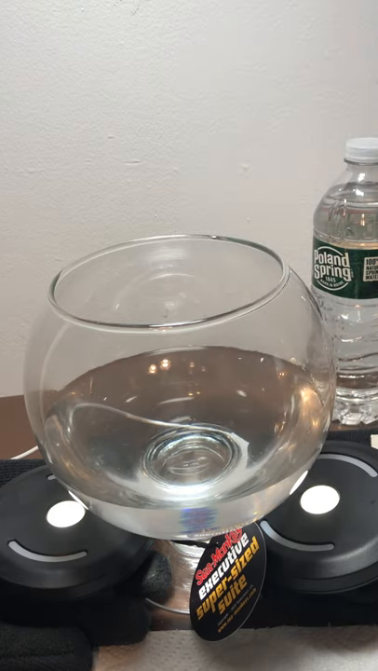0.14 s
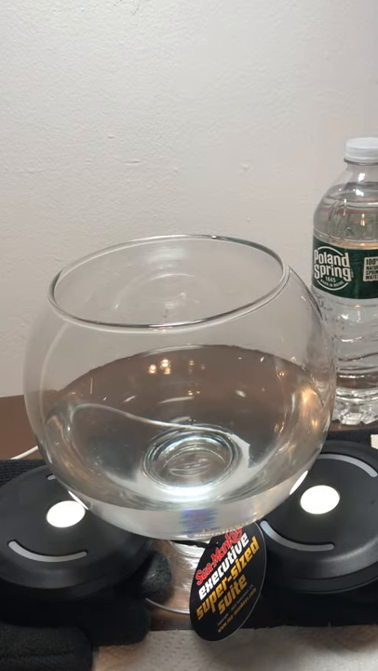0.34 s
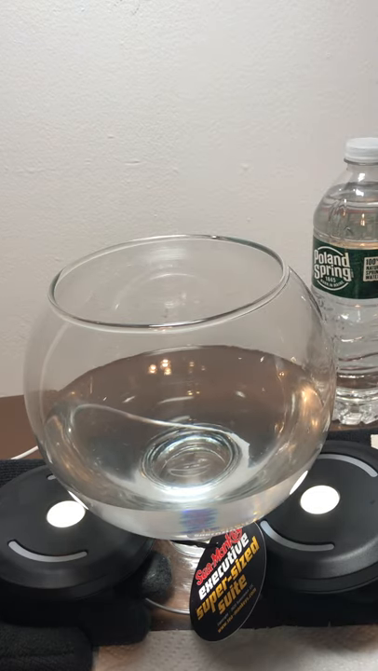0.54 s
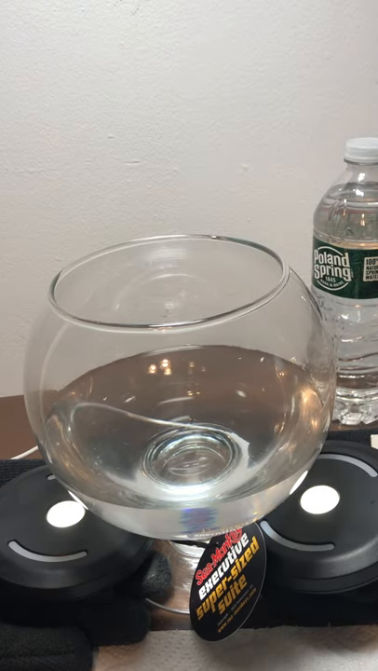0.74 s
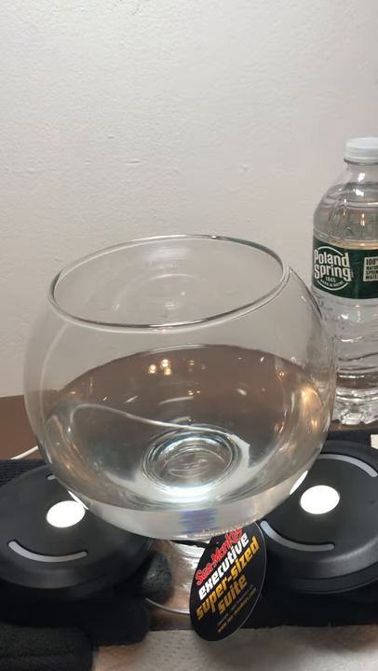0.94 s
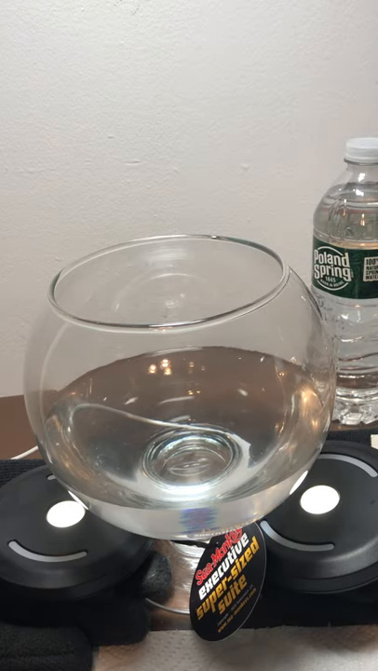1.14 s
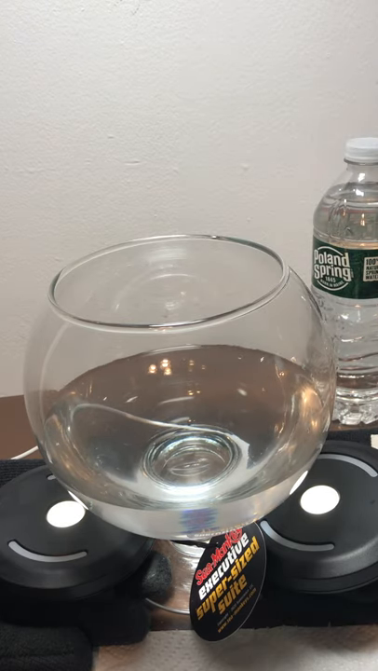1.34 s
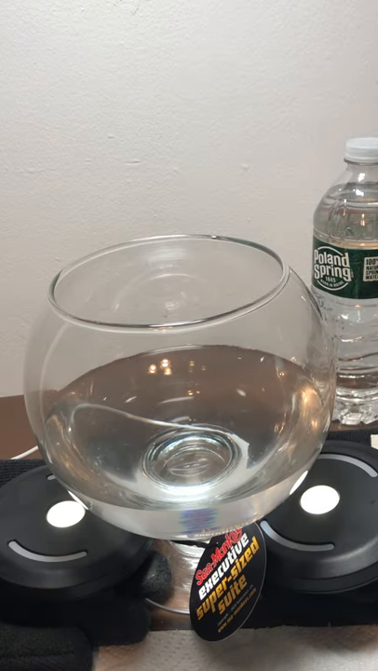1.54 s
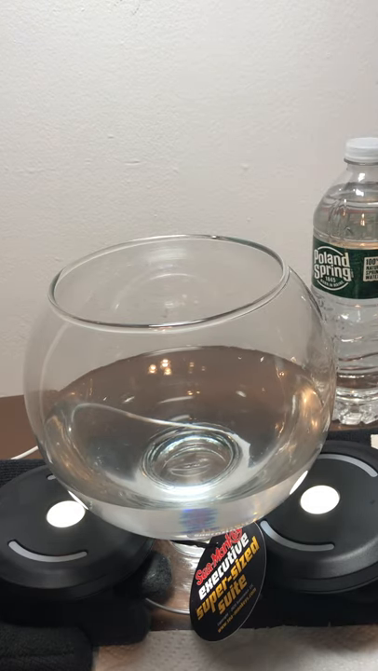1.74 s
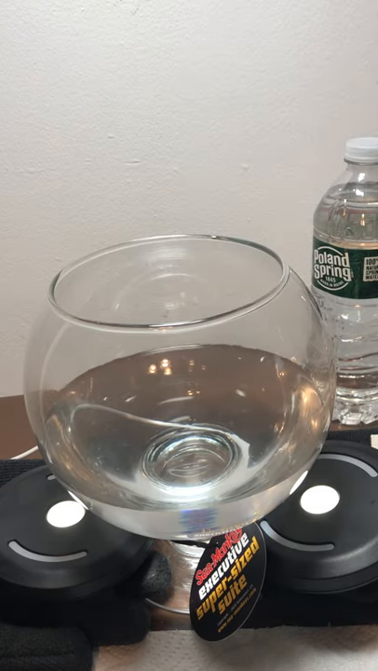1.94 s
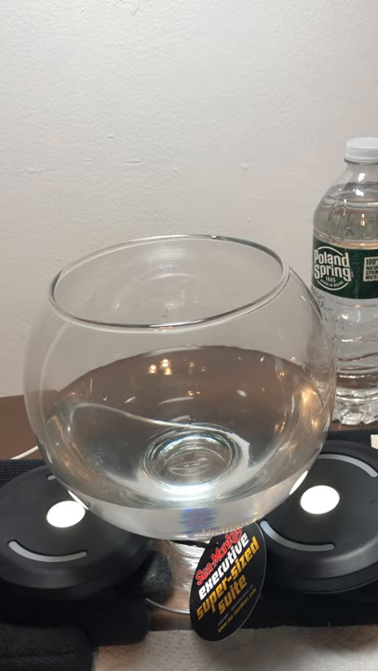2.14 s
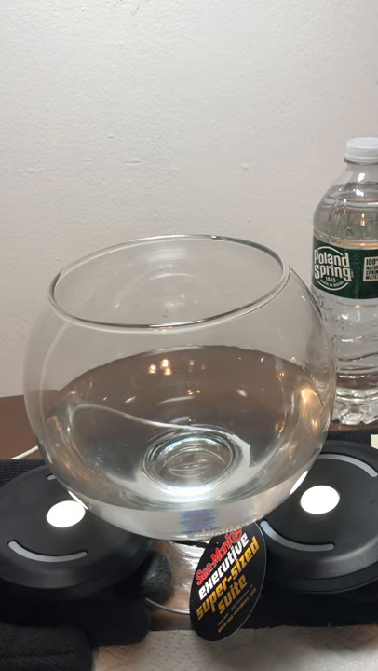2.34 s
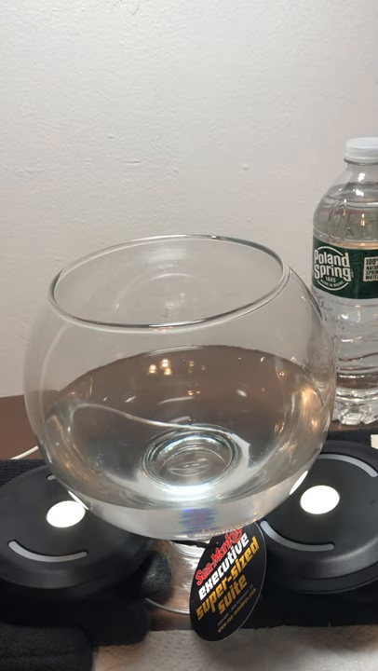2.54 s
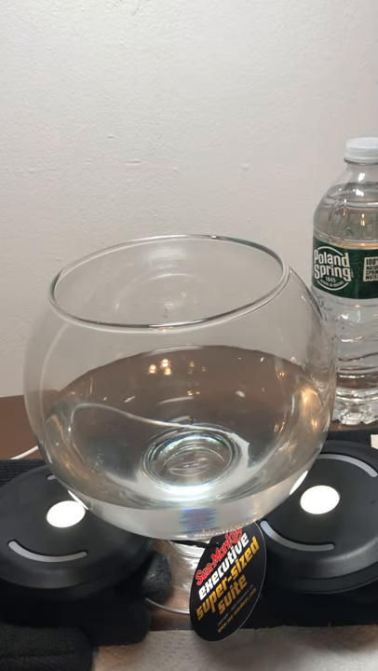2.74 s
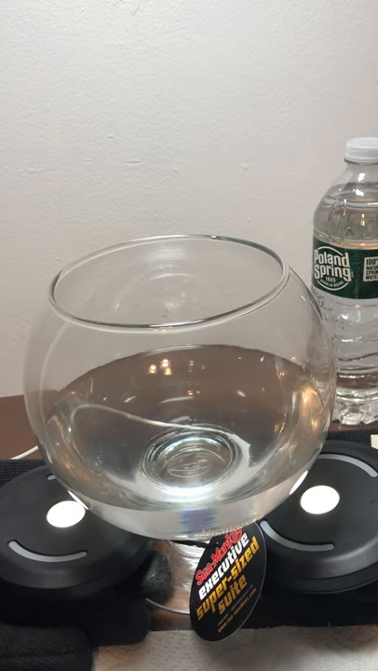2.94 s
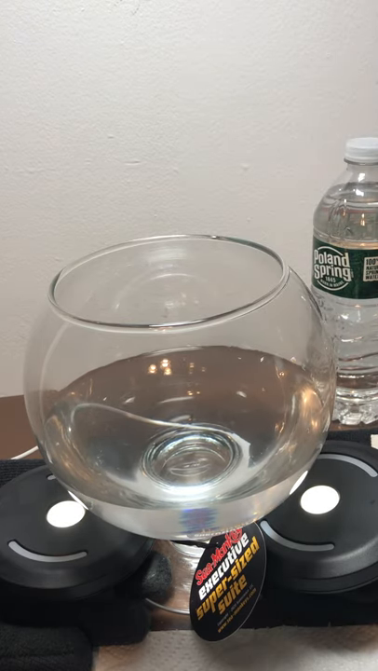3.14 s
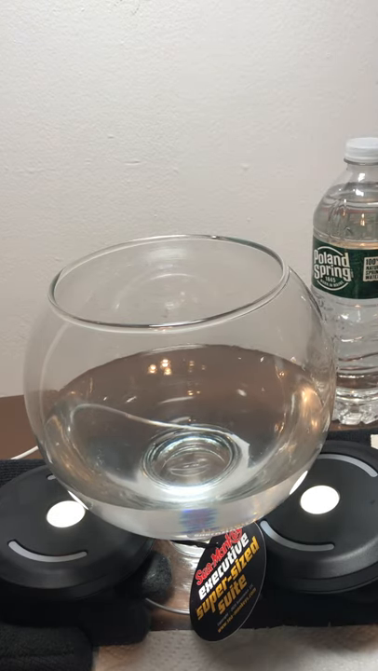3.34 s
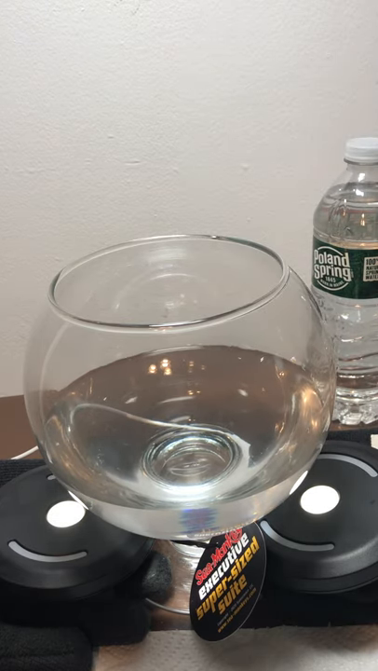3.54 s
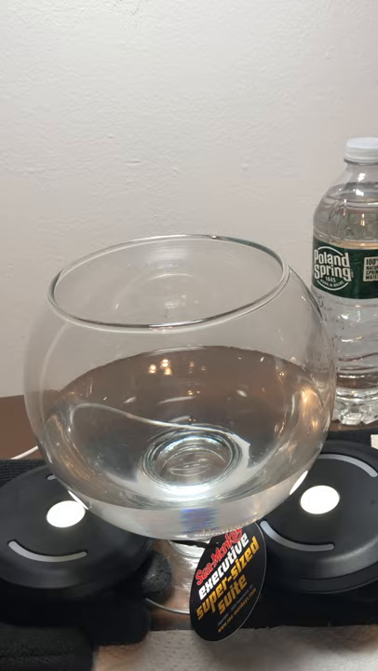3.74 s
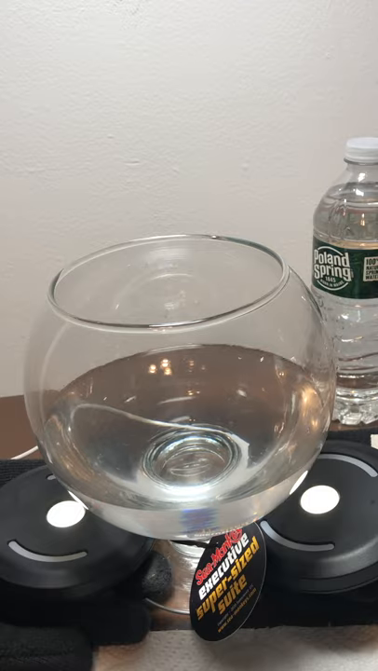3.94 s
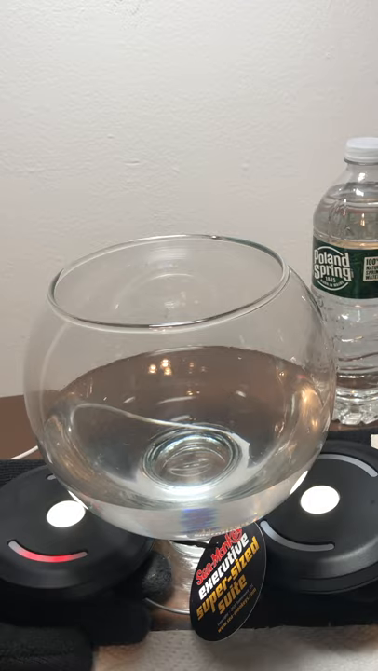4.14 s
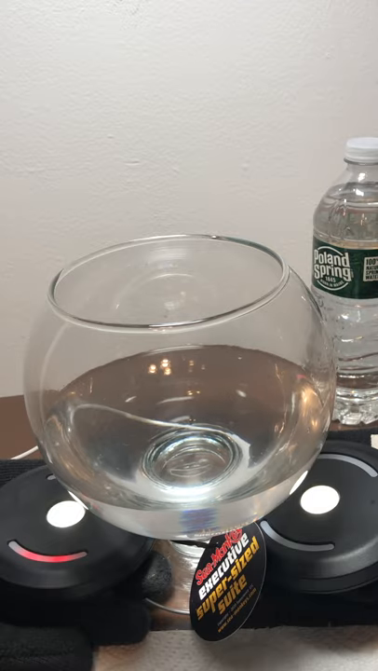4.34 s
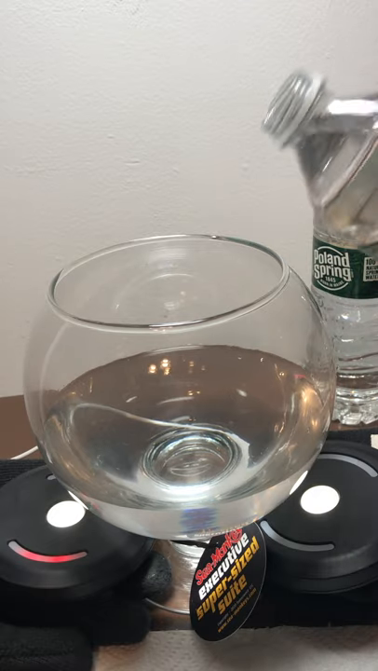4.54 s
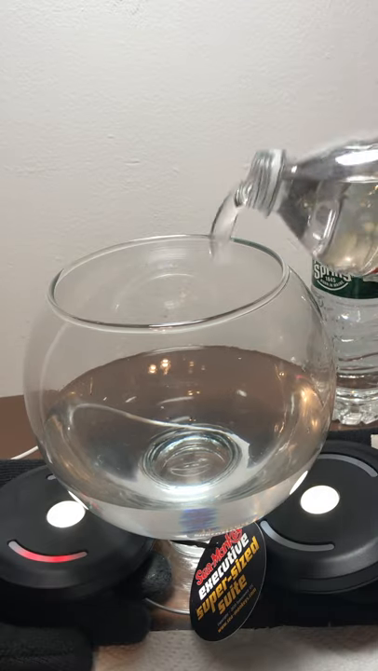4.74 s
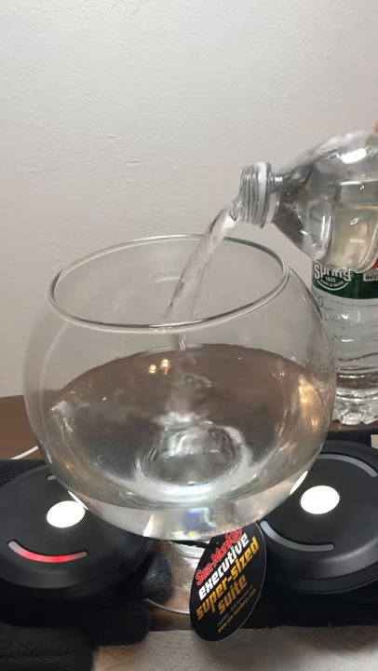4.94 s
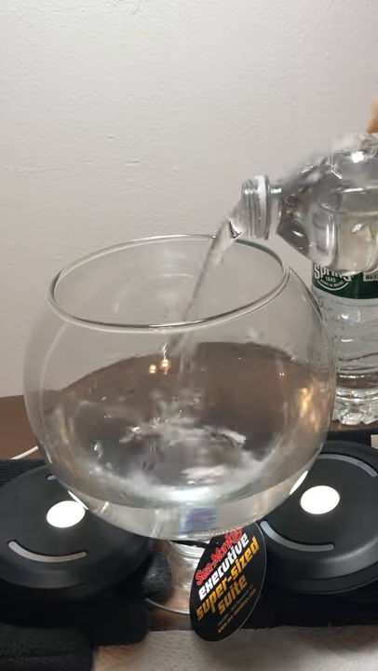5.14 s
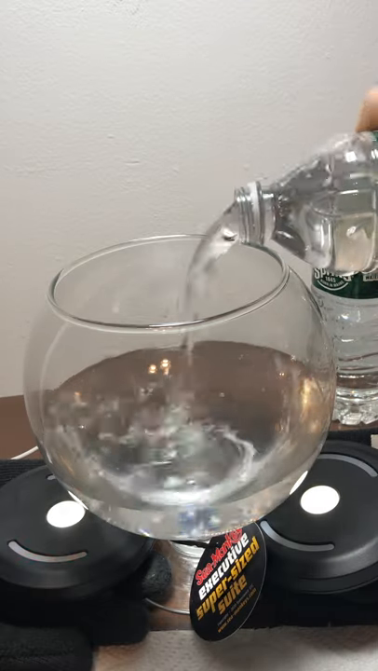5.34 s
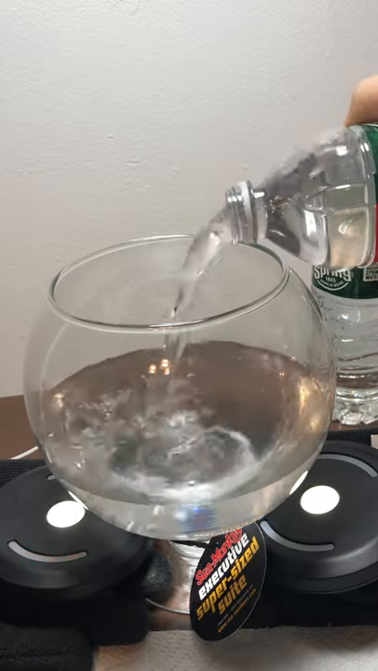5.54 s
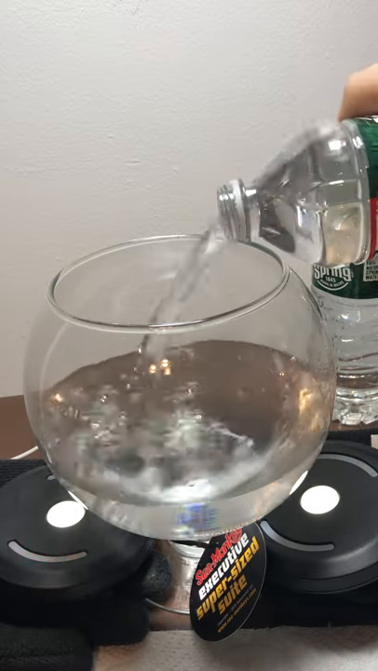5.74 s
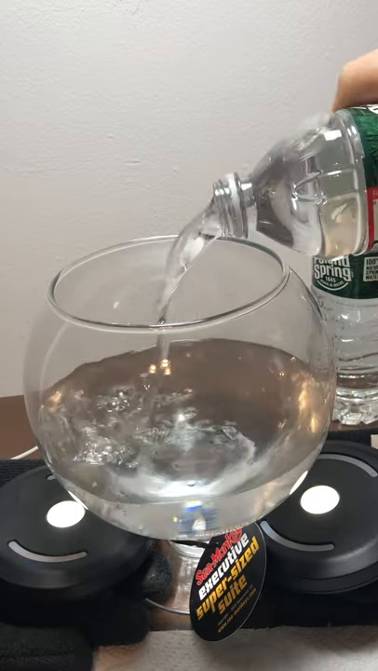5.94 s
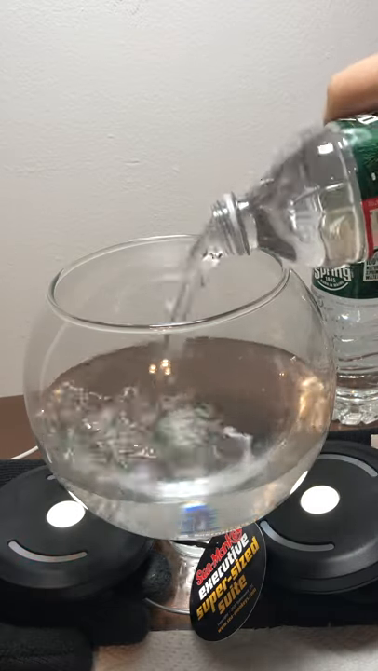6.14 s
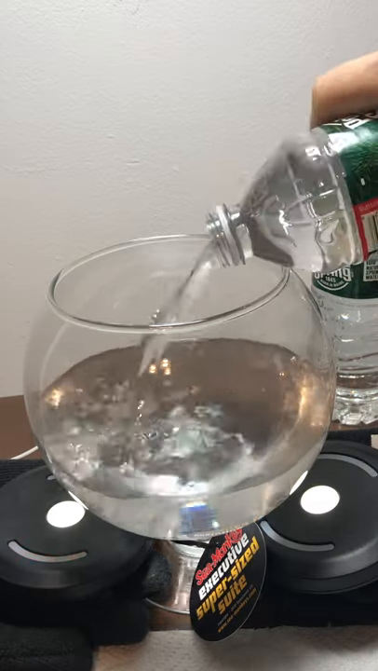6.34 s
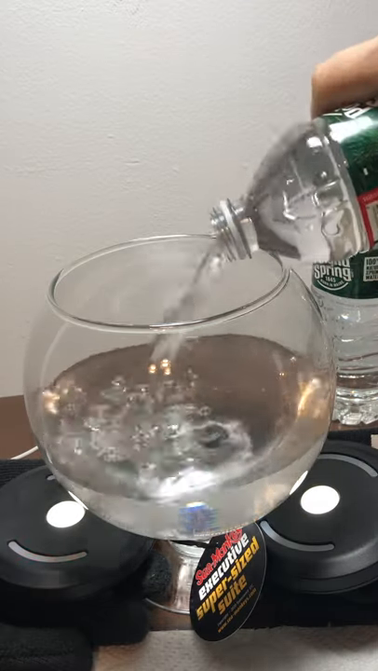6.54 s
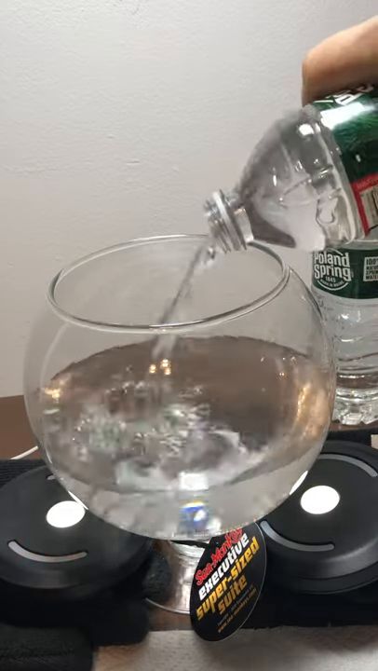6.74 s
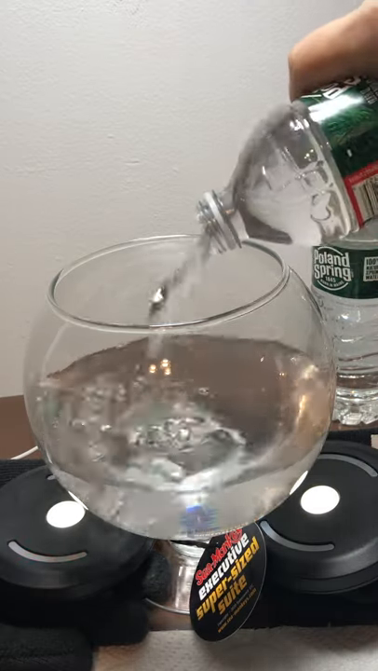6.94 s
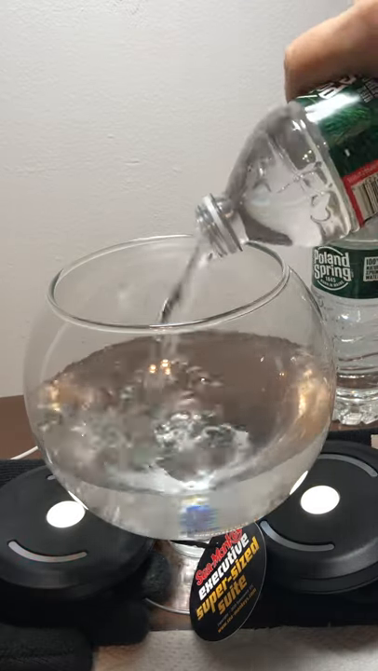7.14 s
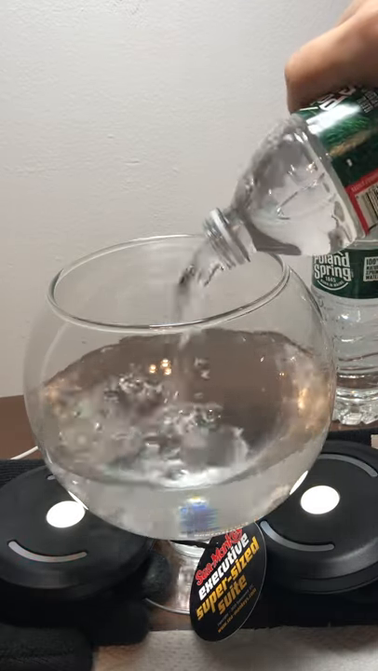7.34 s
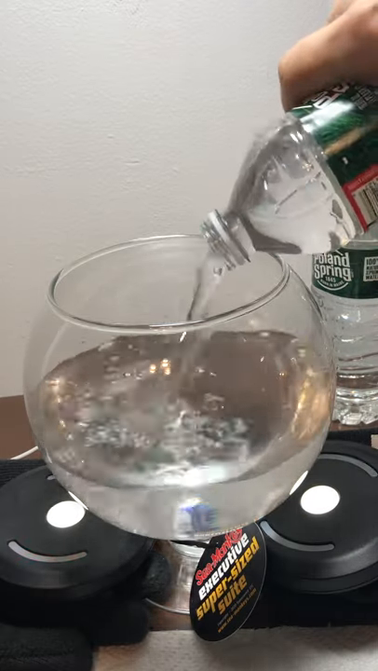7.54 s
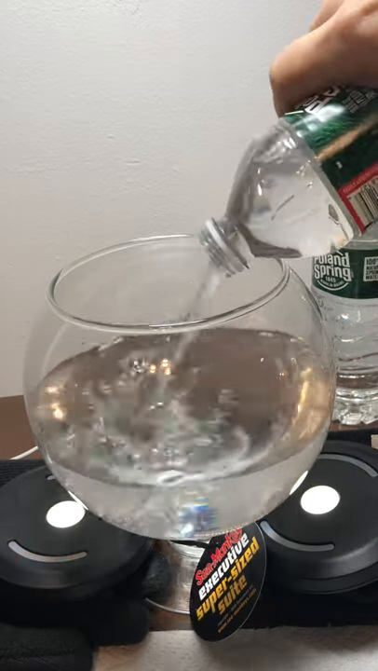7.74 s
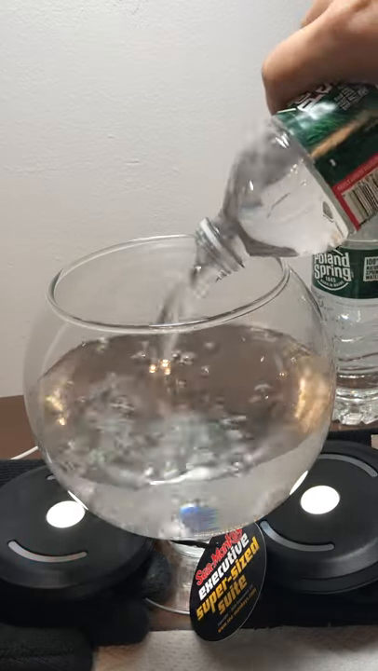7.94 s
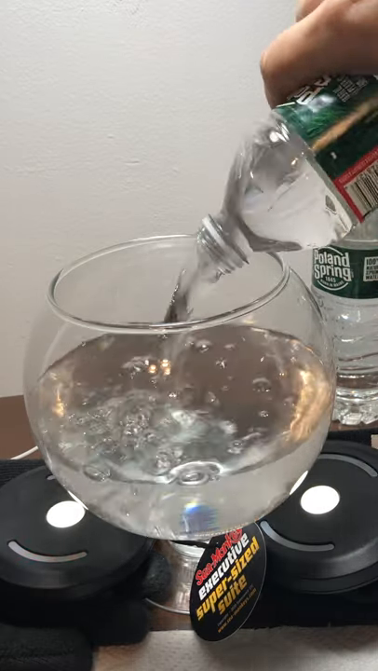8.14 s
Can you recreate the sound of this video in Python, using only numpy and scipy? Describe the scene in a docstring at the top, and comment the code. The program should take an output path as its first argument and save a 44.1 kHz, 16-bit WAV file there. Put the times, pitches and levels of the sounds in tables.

```python
"""A thin plastic bottle ticks and snaps in the hand, in a quiet room, until the seal of its cap cracks open.
Then water pours into a half-full glass bowl. The stream arrives in slugs: each splashes and traps
a pocket of air that glugs and sets the bowl ringing, while small bubbles plink and fizz around it
and droplets patter back. A faint mains hum lies under everything."""
import sys
import numpy as np
from scipy import signal
from scipy.fft import rfft, irfft
from scipy.io import wavfile
from scipy.ndimage import uniform_filter1d

SR = 44100
rng = np.random.default_rng(int(sys.argv[2]) if len(sys.argv) > 2 else 0)


def store_wav(level_fs):
    """Save 16-bit WAV to argv[1]."""
    pcm = np.round(np.clip(np.atleast_2d(level_fs), -1, 1) * 32767)
    wavfile.write(sys.argv[1], SR, pcm.T.astype(np.int16))


N = 361619
TIME = np.arange(N) / SR

# air pockets trapped by the slugs of water: start_s, level_db, pitch_hz, t60_s, bowl_ring_db
GLUGS = [(4.980, -29.5, 558.5, 0.18, -49.5), (5.183, -45.5, 711, 0.13, -63), (5.257, -44, 682, 0.088, -59),
         (5.300, -43, 597, 0.39, -55), (5.4324, -29.5, 550, 0.13, -44), (5.585, -37, 507, 0.038, -49.5),
         (5.623, -38.5, 413, 0.01, -75), (5.680, -35.5, 715, 0.047, -50.5), (5.753, -45.5, 700, .1, -56),
         (5.918, -40, 640, 0.044, -55), (5.931, -41, 594, 0.24, -53), (6.015, -42.5, 624, 0.081, -55),
         (6.059, -40, 469, 0.32, -44), (6.425, -37, 721.5, 0.12, -42), (6.541, -34.5, 752, 0.058, -49),
         (6.619, -34, 632, 0.06, -69), (6.633, -38, 666, 0.22, -40.5), (6.7364, -27, 617, 0.095, -57),
         (6.757, -36, 616, 0.2, -59), (6.8435, -28, 626, 0.06, -32), (7.048, -24.5, 535, 0.022, -31),
         (7.056, -35.5, 522, .11, -27), (7.143, -27.5, 500, .055, -38.5), (7.179, -35.5, 970, 0.01, -48),
         (7.260, -30, 633, .11, -46), (7.283, -31, 615.6, 0.36, -38), (7.4452, -16.5, 460, 0.015, -47),
         (7.4557, -23.5, 642, 0.066, -32), (7.575, -24, 631, 0.068, -30.5), (7.5935, -31.5, 589, 0.13, -44),
         (7.6826, -28.5, 602, .1, -42), (7.8, -31, 570, 0.028, -40), (7.8117, -22, 468, 0.062, -45),
         (7.8239, -26, 468, 0.099, -32.5), (7.932, -28, 657, 0.016, -37.5),
         (8.0216, -30.5, 474.6, 0.14, -37), (8.109, -29, 454, 0.035, -51), (8.1385, -27, 650, 0.034, -44)]
# modes of the air in the bowl: pitch_hz, level_db, t60_s
BOWL_AIR_MODES = [(506.7, 2.5, 0.12), (648.4, -3, 0.49)]
# modes of the glass wall: pitch_hz, level_db, t60_s
GLASS_MODES = [(1525, 15.5, 0.07), (1746, 17.5, 0.78), (2370, 10, 0.11), (2963, 14.5, 0.07),
               (4130, 3, 0.14), (4906, -1, 0.039)]
# slugs and drops hitting the surface: start_s, level_db, resonance_hz
SPLASHES = [(4.982, -35, 4900), (5.039, -44.5, 4700), (5.148, -40, 3800), (5.286, -37.5, 8200),
            (5.428, -48, 6120), (5.469, -40.5, 6270), (5.595, -41, 4270), (5.637, -43.5, 5800),
            (5.68, -36, 8700), (5.793, -41, 10600), (5.809, -35.5, 6350), (5.928, -38.5, 7160),
            (5.998, -39.5, 5800), (6.079, -37.5, 5300), (6.186, -43, 5200), (6.269, -44.5, 4930),
            (6.4132, -34, 4750), (6.424, -31.5, 8700), (6.515, -38.5, 5000), (6.540, -33.5, 7800),
            (6.624, -35, 9200), (6.726, -30.5, 8060), (6.844, -25, 5070), (7.04, -38, 5000),
            (7.056, -27, 5240), (7.140, -29, 5730), (7.162, -31, 7740), (7.258, -33, 8100),
            (7.443, -33.5, 6050), (7.491, -45, 11900), (7.582, -30, 9000), (7.687, -27, 7000),
            (7.810, -25.5, 6850), (7.907, -31.5, 12000), (7.932, -25, 8400), (8.023, -29.5, 3770),
            (8.034, -32, 10900), (8.155, -29.5, 4470)]
# small bubbles that stand out of the fizz: start_s, level_db, pitch_hz
PLINKS = [(3.336, -48, 1370), (4.9751, -44, 1300), (5.149, -38, 3480), (5.258, -44, 1640),
          (5.656, -50, 1730), (5.602, -42.5, 4200), (6.518, -39.5, 3130), (6.537, -41.5, 2883),
          (6.836, -40.5, 2386), (7.044, -41.5, 3090), (7.256, -41, 1610), (7.291, -46, 1580),
          (7.442, -32.5, 2398), (7.492, -47, 1525), (7.575, -22.5, 3357), (7.798, -38, 2580),
          (7.811, -39, 3070), (7.907, -37, 3420), (8.021, -36, 3046)]
# pockets that float up to the surface: start_s, peak_db, start_pitch_hz
BLOOPS = [(5.200, -56, 884), (5.238, -52.5, 817), (5.700, -51, 641), (5.88, -64, 1034), (6.955, -52, 673),
          (7.012, -46, 725), (7.232, -47.5, 790), (7.474, -43.5, 884), (7.625, -47, 715),
          (8.035, -50.5, 1040), (8.146, -55, 770)]
# fader moves of the running stream: time_s, fizz_db, slosh_db, hollow_tone_db
STREAM_FADERS = [(4.96, -56, -93, -73), (5.14, -73, -58, -61.5), (6.42, -64.5, -48.5, -51.5),
                 (6.69, -63.5, -48.5, -58.5), (8.2, -63, -46, -49.5)]
# loudness of a tiny bubble by its pitch: pitch_hz, level_db
FIZZ_LEVELS = [(900, 12), (1600, -16.5), (2100, -12), (3200, -11), (5000, -7.5), (8000, -5), (12000, -8),
               (15000, 1.5)]
# tone colour of spray: frequency_hz, level_db
SPRAY_EQ = [(300, 7), (1500, -40.5), (3000, -3.5), (6000, 1), (10000, -2), (16000, -9.5)]
# tone colour of sloshing water: frequency_hz, level_db
SLOSH_EQ = [(30, -15), (75, 2.5), (160, 7.5), (400, -2), (750, 5), (1100, -9.5), (1600, -10), (3000, -13.5),
            (16000, -31.5)]
# sharp snaps of the bottle and its seal: start_s, level_db, resonance_hz
SNAPS = [(0.615, -44, 9420), (0.939, -37.5, 3120), (1.081, -37.5, 4800), (1.664, -48, 6100),
         (1.776, -33, 7150), (1.937, -35.5, 6900), (2.113, -41.5, 3140), (2.533, -41, 9070),
         (2.6897, -17.5, 4630), (2.712, -26.5, 3930)]
# soft, pitched blips of water moving inside the bottle: start_s, level_db, pitch_hz
BLIPS = [(0.717, -62, 3300), (1.375, -56, 1290), (1.622, -62, 1900), (2.649, -55.5, 1220),
         (2.921, -63.5, 3140), (3.078, -64, 3200), (3.141, -56.5, 3060), (4.454, -65, 4400)]
# tone colour of thin plastic: frequency_hz, level_db
PLASTIC_EQ = [(200, -47), (700, -7.5), (1600, -3.5), (3500, 0.5), (6000, -1), (9800, 0), (11000, -3.5),
              (16000, 0.5)]
# modes of the freed cap: pitch_hz, level_db, t60_s
CAP_MODES = [(3860, -43, 0.037), (3740, -43, 0.046)]
# the hand shifting on the bottle: start_s, peak_db, centre_hz, t60_s
RUBS = [(0, -53, 855, 0.37), (0, -53, 1790, 0.34), (0.611, -56.5, 265, 0.43), (1.108, -58, 193, 0.19),
        (1.15, -50.5, 5900, 0.13), (1.94, -57, 258, 0.093), (2.261, -58, 4250, 0.3),
        (2.289, -53.5, 302, 0.18), (2.73, -54.5, 148, 0.093), (3.996, -57, 7700, 0.25)]
# decay of the room's tail: frequency_hz, t60_s
ROOM_DECAY = [(150, 0.39), (1000, 0.3), (4000, 0.25), (9000, 0.23), (16000, 0.11)]
# partials of the mains hum: pitch_hz, rms_db
HUM = [(59.3, -68.5), (124, -75)]
# tone colour of the room's still air: frequency_hz, level_db
AIR_EQ = [(20, -43), (45, -13), (65, -3), (95, -14.5), (140, -9.5), (300, -13.5), (640, -21), (1500, -26),
          (2500, -23.5), (4700, -29), (9000, -37.5), (16000, -39)]

SLUG_STARTS_S = np.array([row[0] for row in GLUGS])
POUR_START_S = SLUG_STARTS_S[0]


def glugs(hold_s=0.027, choke_s=0.0036, opening_hz=964, sag=0.0437, sag_s=0.062, detune=0.019):
    """Pockets ring until crushed; each thumps the water and sets the bowl singing until the next slug."""
    out, t = np.zeros(N), np.arange(SR // 2) / SR
    lag_s = sag * sag_s * (1 - np.exp(-t / sag_s))  # a slug briefly pulls the bowl's pitch flat
    bowl_swell = 1 - np.exp(-t / 0.016)
    thump = bubble(hz=160, t60=0.025, attack_s=0.0013, rise_per_s=-27.5, dive=1.9, dive_s=0.0063)
    gaps_s = np.diff(SLUG_STARTS_S, append=N / SR)
    tunings = 1 + detune * rng.uniform(-1, 1, len(GLUGS))
    for (start, db, hz, t60, ring_db), gap_s, tuning in zip(GLUGS, gaps_s, tunings):
        rise = 4.8 * gain_of(db + 25.5)  # stronger pockets glide up faster
        pocket = bubble(hz, t60, attack_s=0.0016, rise_per_s=rise, dive=opening_hz / hz - 1, dive_s=0.0014)
        crushed_s = np.maximum(t[:len(pocket)] - min(gap_s, hold_s), 0)
        bowl = ring(BOWL_AIR_MODES, (t - lag_s) * tuning) * bowl_swell
        bowl_choke = np.exp(-np.maximum(t - gap_s, 0) / choke_s)
        slosh = puff(SLOSH_EQ, fade(t[:SR // 10], t60=0.066))
        add(out, start, gain_of(db) * pocket * np.exp(-crushed_s / choke_s))
        add(out, start, gain_of(ring_db) * bowl * bowl_choke)
        add(out, start, gain_of(db - 16) * thump)
        add(out, start, gain_of(db - 18) * slosh)
    return out


def bubble(hz, t60, attack_s, rise_per_s, dive=0, dive_s=0.00095):
    """Trapped air rings: the pitch dives while the pocket opens and climbs as it nears the surface."""
    t = np.arange(int(np.clip(t60 + 2 * attack_s, .002, .3) * SR)) / SR
    pitch_hz = hz * np.clip(1 + dive * np.exp(-t / dive_s) + rise_per_s * t, .7, 3)
    envelope = unit_peak((1 - np.exp(-(t / attack_s) ** 2)) * fade(t, t60))
    return envelope * np.sin(2 * np.pi * np.cumsum(np.minimum(pitch_hz, SR / 2)) / SR)


def splashes(scatter_s=.008, spread_db=16, bubbles_each=24):
    """Each impact cracks and throws a short shower of tiny bubbles."""
    out, t = np.zeros(N), np.arange(SR // 20) / SR
    envelope = (1 - np.exp(-t / 0.0025)) * fade(t, t60=0.035)
    for start, db, hz in SPLASHES:
        add(out, start, gain_of(db - 4) * puff(SPRAY_EQ, envelope, hz, bump_db=11.5, octaves=0.19))
        for delay, softness, *traits in rng.random((bubbles_each, 5)):
            bubble_db = db - 6 - spread_db * softness
            add(out, start + scatter_s * long_tail(delay), gain_of(bubble_db) * tiny_bubble(*traits))
    return out


def plinks():
    """Single clear bubbles: small ones plink, larger ones bloop upward as they surface."""
    out = np.zeros(N)
    for start, db, hz in PLINKS:
        add(out, start, gain_of(db - 5) * bubble(hz, t60=0.033, attack_s=0.00005, rise_per_s=2.2))
    for start, db, hz in BLOOPS:
        add(out, start, gain_of(db) * bubble(hz, t60=0.08, attack_s=0.0057, rise_per_s=11))
    return out


def droplets(per_s=150, count=700):
    """Flung droplets patter back onto the surface, riding the level of the fizz."""
    out, t = np.zeros(N), np.arange(SR // 100) / SR
    times_s, fizz_db, *_ = np.transpose(STREAM_FADERS)
    waits, sizes, pitches = rng.random((count, 3)).T
    starts = POUR_START_S + np.cumsum(long_tail(waits)) / per_s
    for start, size, pitch in zip(starts, sizes, pitches):
        if start < times_s[-1]:
            db = np.interp(start, times_s, fizz_db) + 9 + 3 * min(long_tail(size), 3)
            pat = puff(SPRAY_EQ, fade(t, t60=0.013), hz=3000 * 4.5 ** pitch, bump_db=17.5, octaves=0.12)
            add(out, start, gain_of(db) * pat)
    return out


def stream(hollow_hz=637, hollow_width_hz=16, trail_s=.028, bubble_count=4000):
    """The jet drags air under: fizz and mist over a lumpy slosh that feeds the bowl's hollow tone."""
    times_s, *faders_db = np.transpose(STREAM_FADERS)
    fizz_gain, slosh_gain, hollow_gain = (gain_of(np.interp(TIME, times_s, db)) for db in faders_db)
    pouring = TIME > POUR_START_S
    fizz = np.zeros(N)
    # the fizz comes in swarms that trail behind the splashes
    for which, delay, size, *traits in rng.random((bubble_count, 6)):
        start = SPLASHES[int(which * len(SPLASHES))][0] + trail_s * long_tail(delay)
        add(fizz, start, gain_of(7.5 * min(long_tail(size), 4)) * tiny_bubble(*traits))
    fizz /= fizz[pouring].std()
    mist = gain_of(-8) * noise(SPRAY_EQ) * flicker(depth_db=-2, seconds=0.0059)
    slosh = gain_of(-10) * noise(SLOSH_EQ) * flicker(depth_db=4, seconds=.012)
    resonator = signal.iirpeak(hollow_hz, hollow_hz / hollow_width_hz, SR)
    hollow = gain_of(-5) * unit_rms(signal.lfilter(*resonator, noise(SLOSH_EQ)))
    wash = fizz_gain * mist + slosh_gain * slosh + hollow_gain * hollow
    return (fizz_gain * fizz + churn() * wash) * pouring


def tiny_bubble(smallness, ringing, climb):
    """One grain of fizz; three traits from 0 to 1 raise its pitch, ring time and upward glide."""
    lowest_hz, highest_hz = FIZZ_LEVELS[0][0], FIZZ_LEVELS[-1][0]
    hz = lowest_hz * (highest_hz / lowest_hz) ** (smallness ** .55)
    t60 = (.006 + .02 * ringing ** 2) * (4000 / hz) ** .2
    tone = bubble(hz, t60, attack_s=.5 / hz, rise_per_s=.1 * climb ** 2 / t60)
    return gain_of(curve_at(FIZZ_LEVELS, hz)) * tone


def churn(stir_db=1.5, settle_db_per_s=43, settle_s=0.08):
    """Gain of the water's unrest: it jumps with every slug, then settles."""
    since_slug_s = abs(TIME - SLUG_STARTS_S[np.searchsorted(SLUG_STARTS_S, TIME) - 1])
    calming_s = uniform_filter1d(np.minimum(since_slug_s, settle_s), SR // 200)
    return gain_of(stir_db - settle_db_per_s * calming_s)


def glass_wall(water):
    """The wall of the bowl rings along with the water that drives it."""
    out = water.copy()
    for hz, db, t60 in GLASS_MODES:
        decay = fade(1 / SR, t60)
        pole = decay * np.exp(2j * np.pi * hz / SR)
        out += 2 * gain_of(db) * signal.lfilter([1 - decay], [1, -pole], water).real
    return out


def bottle(seal_break_s=2.711):
    """The gripped bottle snaps and the water inside blips; the seal breaks and leaves the cap ringing briefly."""
    out = np.zeros(N)
    for start, db, hz in SNAPS:
        t60 = 0.029 / gain_of(0.16 * (db + 41))  # harder snaps are over sooner
        snap = buckle(hz, t60, focus_db=9, tick_db=-1, crack_db=-6, rattle_db=-7)
        add(out, start, gain_of(db) * snap)
    for start, db, hz in BLIPS:
        blip = buckle(hz, t60=0.042, focus_db=24, tick_db=-3, crack_db=13, rattle_db=2.5)
        add(out, start, gain_of(db) * blip)
    add(out, seal_break_s, ring(CAP_MODES, np.arange(SR // 8) / SR))
    return out


def buckle(hz, t60, focus_db, tick_db, crack_db, rattle_db):
    """Thin plastic buckles with a broad crack, a sharp tick and a narrower rattle around hz."""
    t = np.arange(SR // 8) / SR
    bump_db = focus_db - curve_at(PLASTIC_EQ, hz)
    crack = puff(PLASTIC_EQ, fade(t, t60), hz, bump_db, octaves=1.16)
    tick = puff(PLASTIC_EQ, fade(t, t60=0.0048), hz, focus_db, octaves=0.9)
    rattle = puff(PLASTIC_EQ, fade(t, t60), hz, bump_db, octaves=0.45)
    return gain_of(crack_db) * crack + gain_of(tick_db) * tick + gain_of(rattle_db) * rattle


def hand_rubs():
    """Skin slides over the bottle: soft rubs that swell quickly and die away."""
    out, t, bins_hz = np.zeros(N), np.arange(SR) / SR, np.arange(SR // 2 + 1)
    for start, db, hz, t60 in RUBS:
        band = bell(bins_hz, hz, octaves=0.49 * (1 + hz / 1300))  # brighter rubs are broader
        rub = irfft(rfft(rng.standard_normal(SR)) * band, SR)
        add(out, start, gain_of(db) * unit_peak(rub * t * fade(t, t60)))
    return out


def room(sound, near_db, tail_db, echoes_per_s=3000, predelay_s=.006):
    """Close echoes from the table and the wall, then a short tail that dulls as it dies."""
    size = SR // 2
    echoes = rng.choice([-1., 1.], size) * (rng.random(size) < echoes_per_s / SR)
    echoes *= np.arange(size) > predelay_s * SR
    hz, t, bands = signal.stft(echoes, SR, nperseg=256)
    decay = np.exp(-np.log(1000) * t / curve_at(ROOM_DECAY, hz)[:, None])
    _, tail = signal.istft(bands * decay, SR, nperseg=256)
    response = gain_of(tail_db) * tail / np.linalg.norm(tail)
    for delay_s, strength in [(.0013, .6), (.0029, -.55), (.0041, .5), (.0083, .35)]:
        response[round(delay_s * SR)] += gain_of(near_db) * strength
    return sound + signal.fftconvolve(sound, response)[:N]


def room_tone(air_db=-67, waver_rad=0.053):
    """Still air and a slightly wavering mains hum."""
    drift = waver_rad * wander(seconds=0.125)
    hum = sum(np.sqrt(2) * gain_of(db) * np.sin(2 * np.pi * hz * TIME + drift) for hz, db in HUM)
    return gain_of(air_db) * noise(AIR_EQ) + hum


def puff(eq, envelope, hz=1000, bump_db=0, octaves=.4):
    """A burst of noise rings out through an EQ curve with an extra resonance at hz."""
    size = 4096
    bins_hz = abs(np.fft.fftfreq(size, 1 / SR))
    shape_db = curve_at(eq, bins_hz) + bump_db * bell(bins_hz, hz, octaves)
    minimum_phase = np.exp(np.conj(signal.hilbert(np.log(gain_of(shape_db)))))  # keeps the attack sharp
    burst = envelope * rng.standard_normal(len(envelope))
    return unit_peak(signal.fftconvolve(burst, np.fft.ifft(minimum_phase).real[:size // 2]))


def noise(eq):
    """Steady noise coloured by an EQ curve."""
    colour = gain_of(curve_at(eq, np.fft.rfftfreq(N, 1 / SR)))
    return unit_rms(irfft(rfft(rng.standard_normal(N)) * colour, N))


def ring(modes, t):
    """The free ringing of a set of modes."""
    return sum(gain_of(db) * fade(t, t60) * np.sin(2 * np.pi * hz * t) for hz, db, t60 in modes)


def flicker(depth_db, seconds):
    """A gain that flutters at random."""
    return unit_rms(gain_of(depth_db * wander(seconds)))


def wander(seconds):
    """A smooth random curve that changes over the given time."""
    size = int(seconds * SR)
    return unit_rms(uniform_filter1d(uniform_filter1d(rng.standard_normal(N), size), size))


def long_tail(chance):
    """Turns an even chance from 0 to 1 into mostly small values and a few large ones."""
    return -np.log(1 - chance)


def curve_at(points, hz):
    """The value of a curve at hz, on a log-frequency axis."""
    points_hz, values = np.transpose(points)
    return np.interp(np.log(hz + 1), np.log(points_hz + 1), values)


def bell(bins_hz, centre_hz, octaves):
    return np.exp(-(np.log2((bins_hz + 1) / centre_hz) / octaves) ** 2)


def fade(t, t60):
    return np.exp(-np.log(1000) * t / max(t60, 1e-3))


def gain_of(db):
    return 10 ** (np.asarray(db) / 20)


def unit_rms(x):
    return x / np.sqrt(np.mean(x ** 2) + 1e-20)


def unit_peak(x):
    return x / (abs(x).max() + 1e-20)


def add(mix, start_s, sound):
    part = mix[max(round(start_s * SR), 0):][:len(sound)]
    part += sound[:len(part)]


def scene():
    """The pour in its bowl and the bottle in the hand, both in a small room, in mono."""
    water = glugs() + glass_wall(splashes() + plinks() + droplets() + stream())
    pour = room(water, near_db=-50, tail_db=-16.5)
    opening = room(bottle(), near_db=-8.5, tail_db=-7.5)
    return (pour + opening + hand_rubs() + room_tone())[None]


def record(dry, cutoff_hz=15950):
    """A steep low-pass trims the very top of the mix."""
    low_pass = signal.firwin(511, cutoff_hz, window=("kaiser", 9), fs=SR)
    return signal.oaconvolve(dry, low_pass[None], "same")


dry = scene()
out = record(dry)
store_wav(out)
```